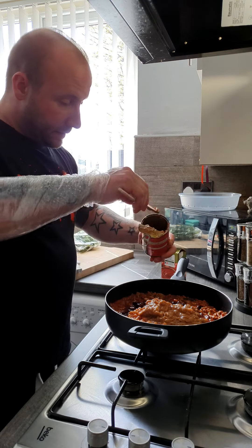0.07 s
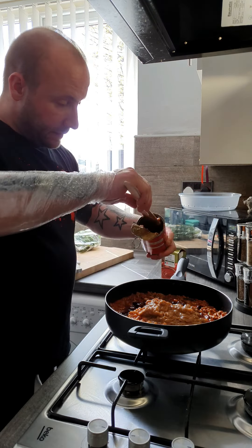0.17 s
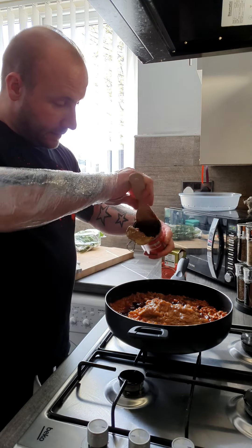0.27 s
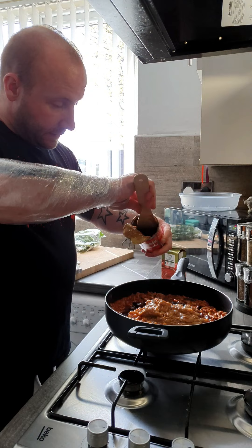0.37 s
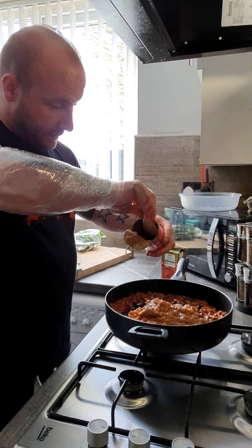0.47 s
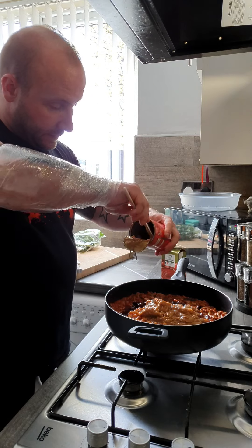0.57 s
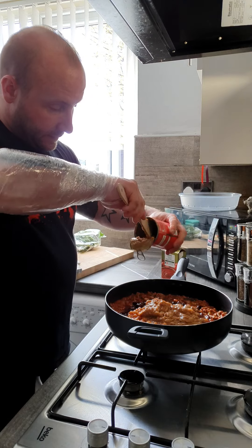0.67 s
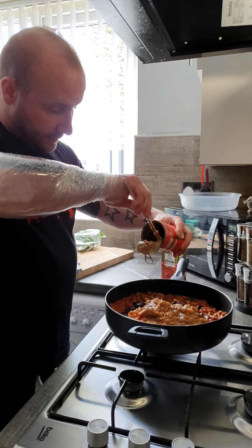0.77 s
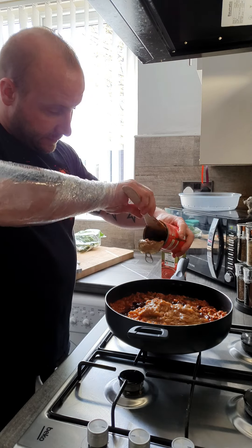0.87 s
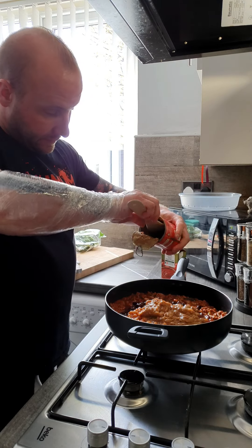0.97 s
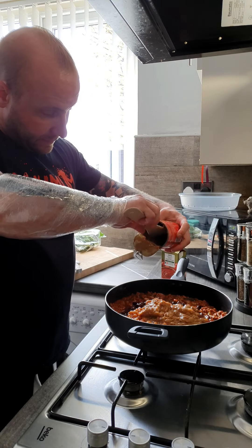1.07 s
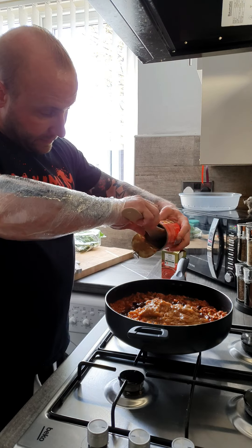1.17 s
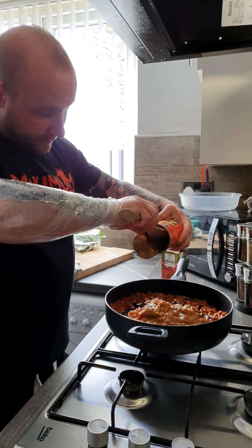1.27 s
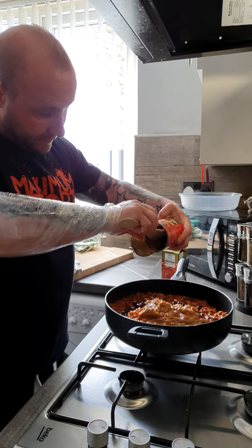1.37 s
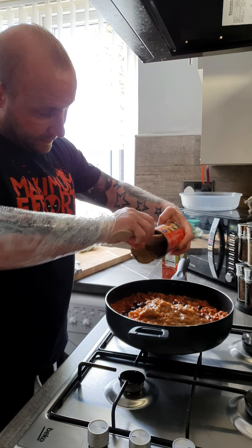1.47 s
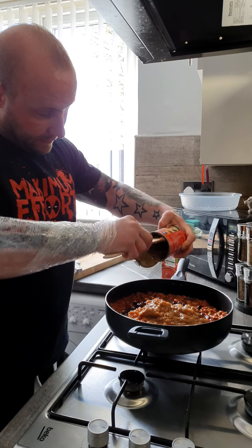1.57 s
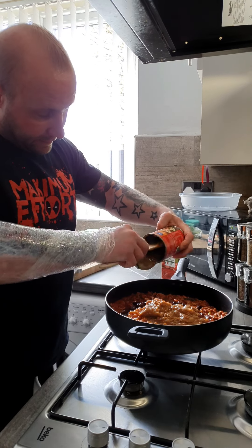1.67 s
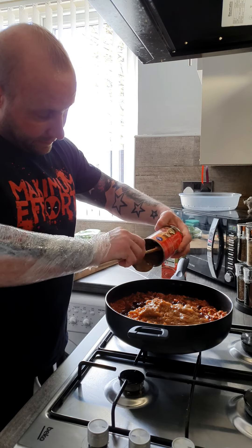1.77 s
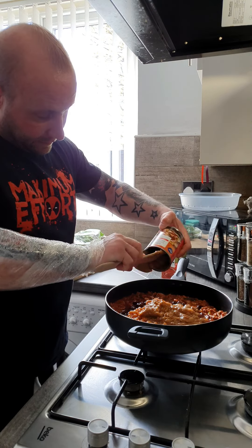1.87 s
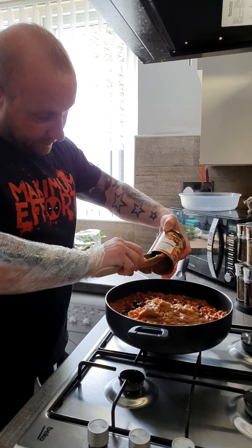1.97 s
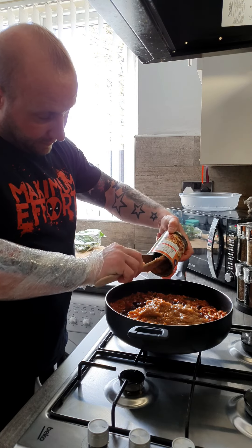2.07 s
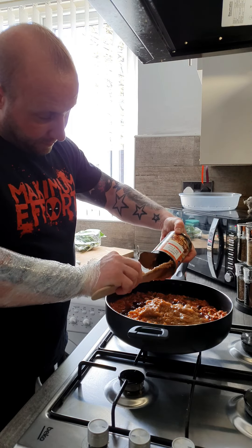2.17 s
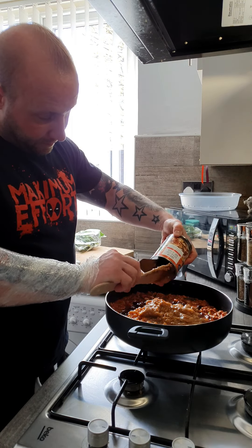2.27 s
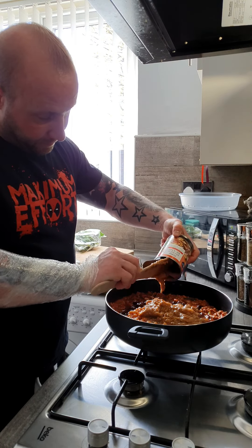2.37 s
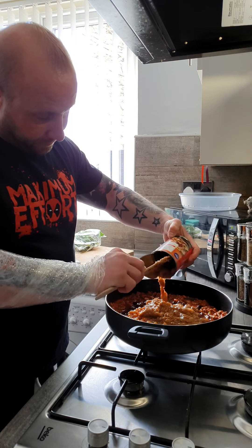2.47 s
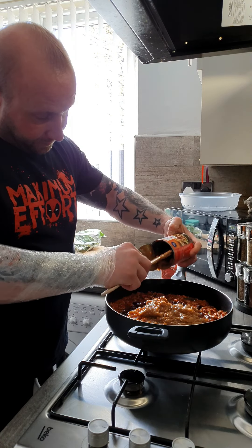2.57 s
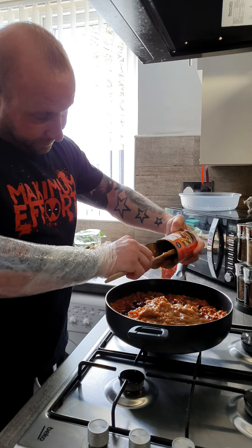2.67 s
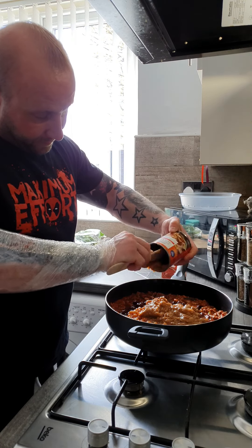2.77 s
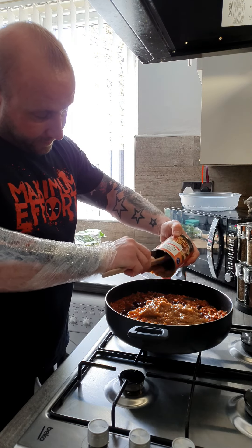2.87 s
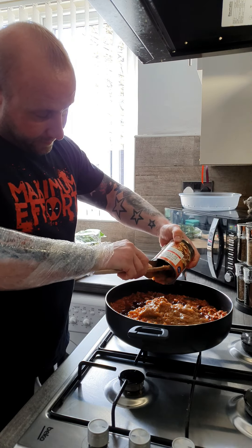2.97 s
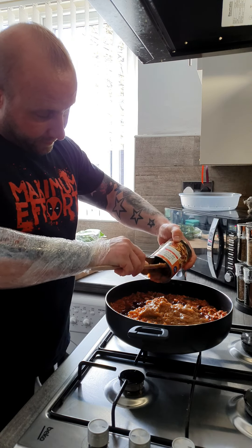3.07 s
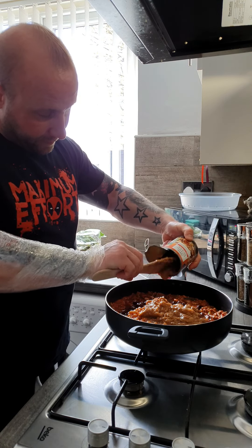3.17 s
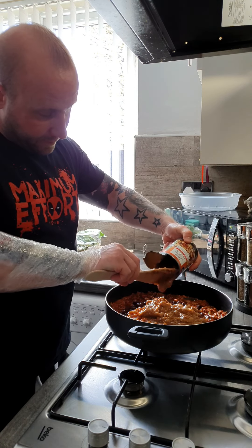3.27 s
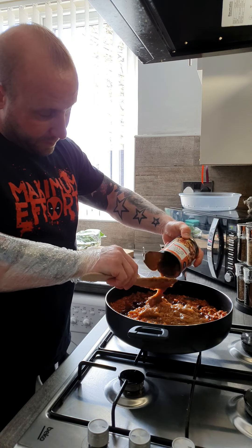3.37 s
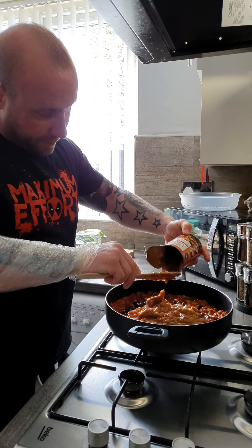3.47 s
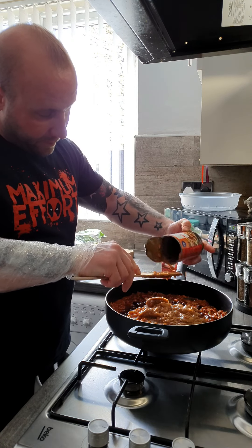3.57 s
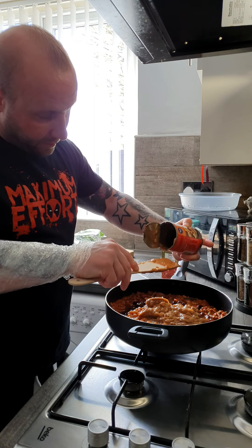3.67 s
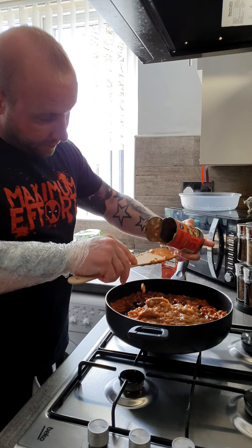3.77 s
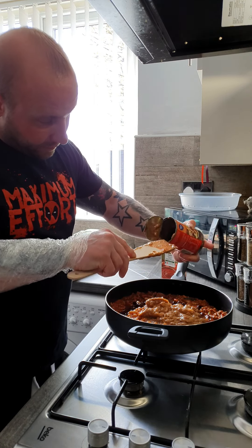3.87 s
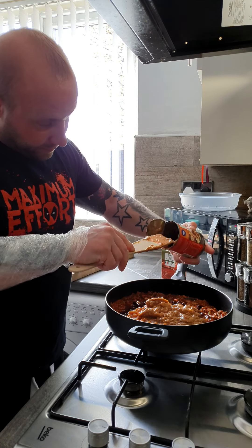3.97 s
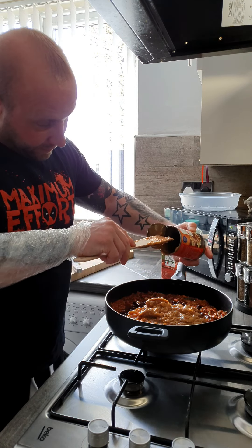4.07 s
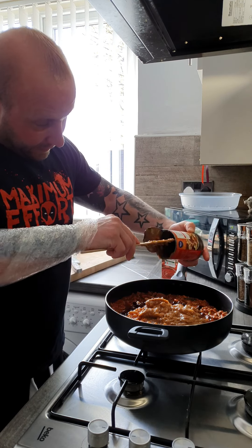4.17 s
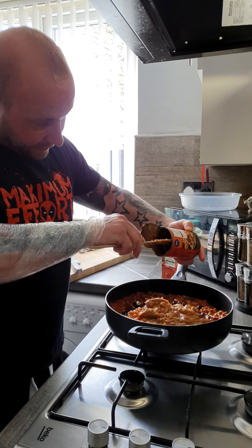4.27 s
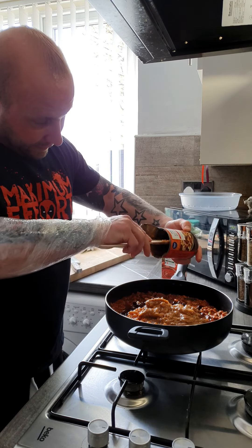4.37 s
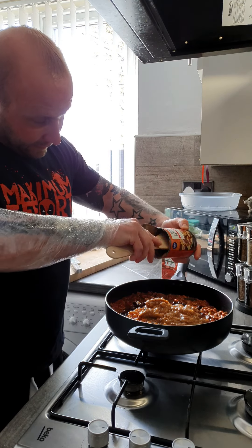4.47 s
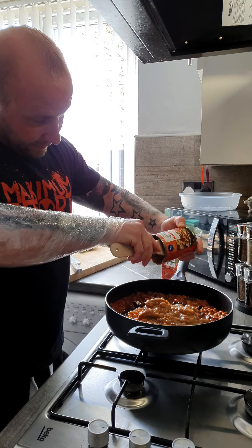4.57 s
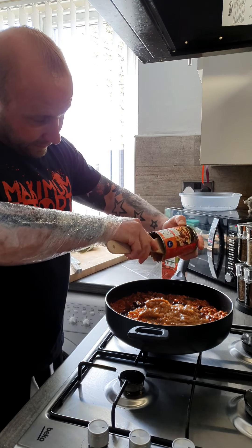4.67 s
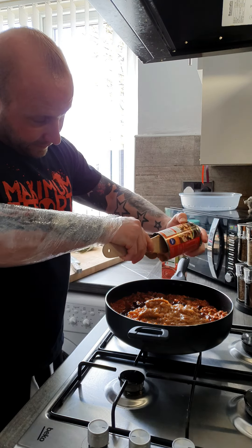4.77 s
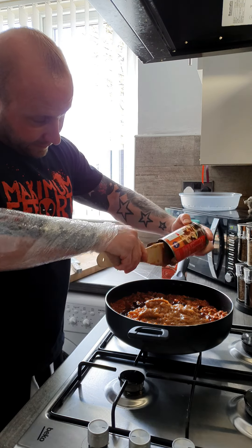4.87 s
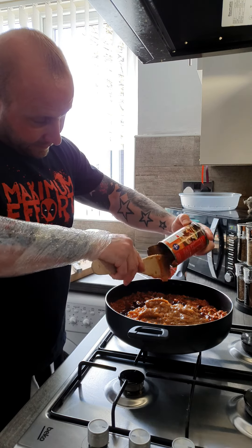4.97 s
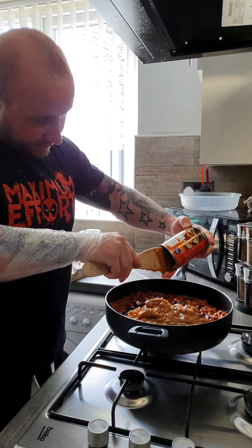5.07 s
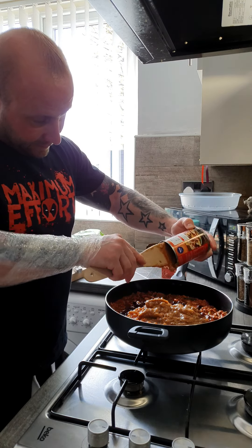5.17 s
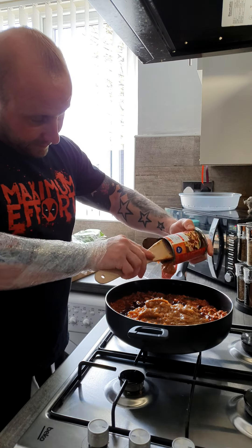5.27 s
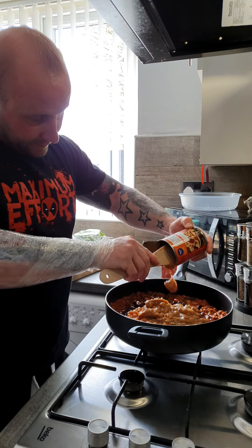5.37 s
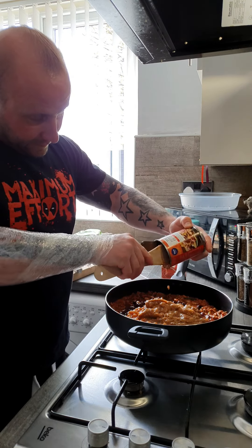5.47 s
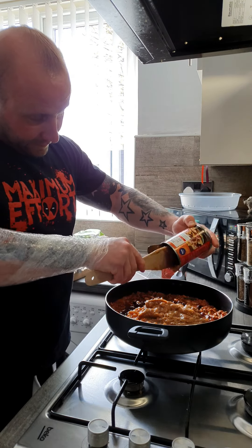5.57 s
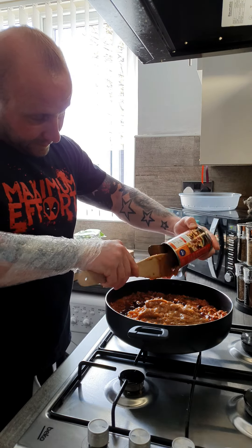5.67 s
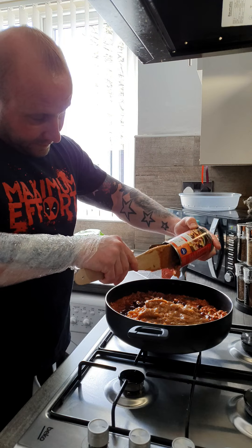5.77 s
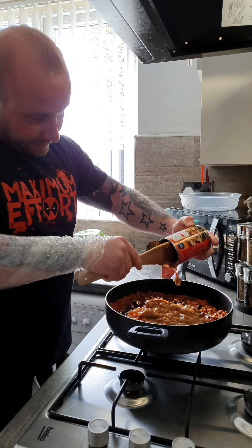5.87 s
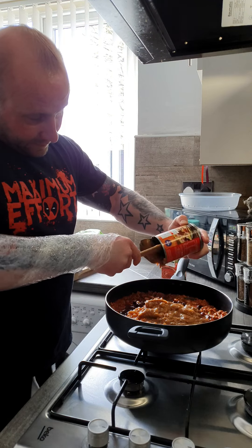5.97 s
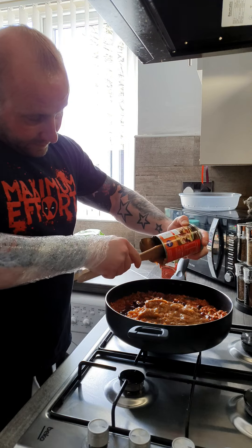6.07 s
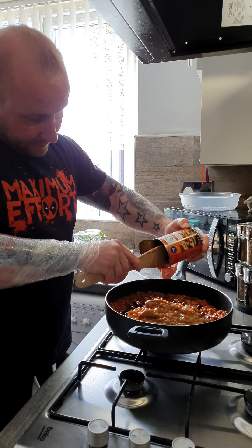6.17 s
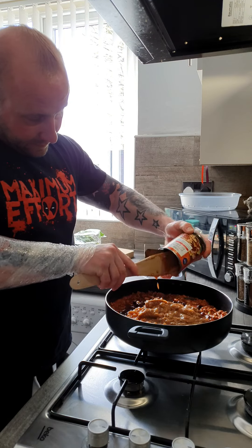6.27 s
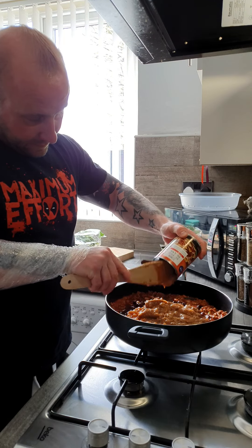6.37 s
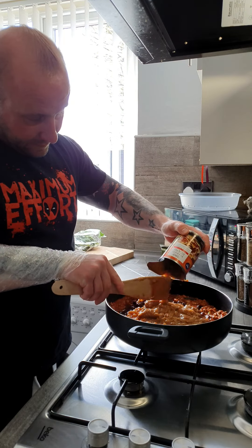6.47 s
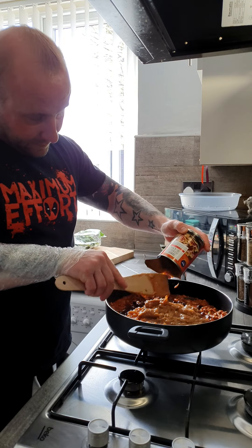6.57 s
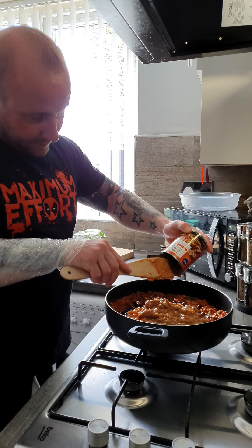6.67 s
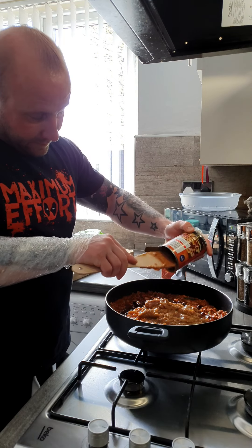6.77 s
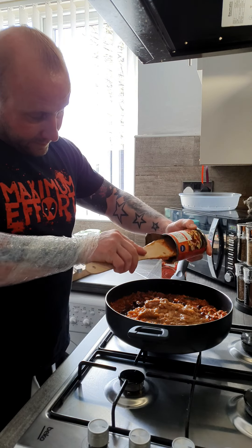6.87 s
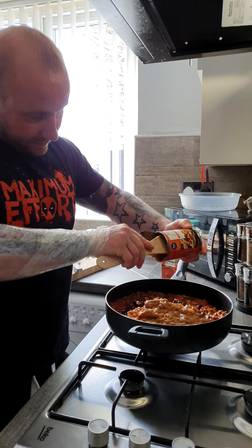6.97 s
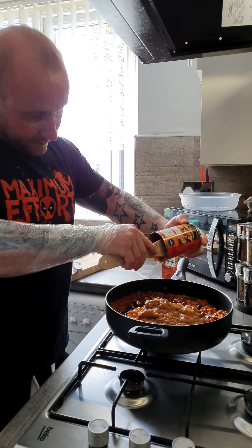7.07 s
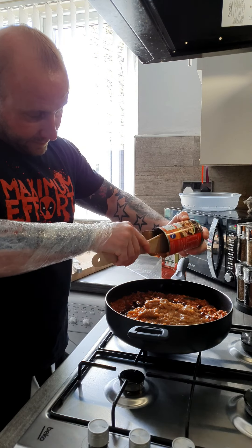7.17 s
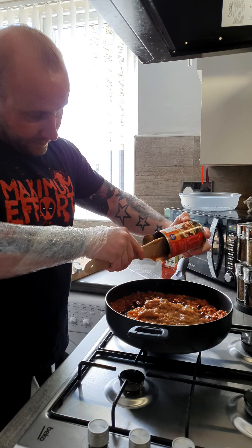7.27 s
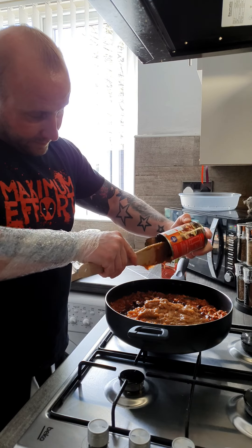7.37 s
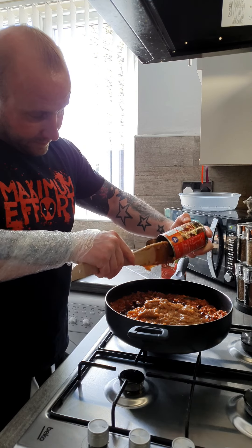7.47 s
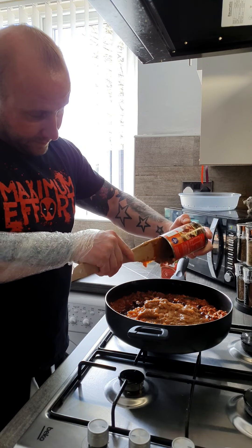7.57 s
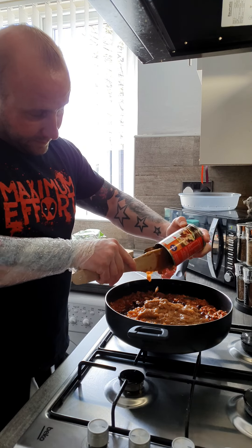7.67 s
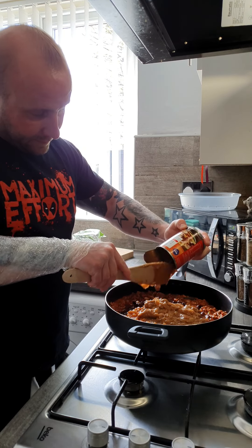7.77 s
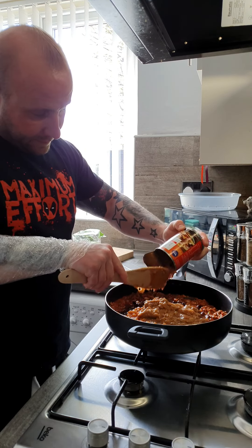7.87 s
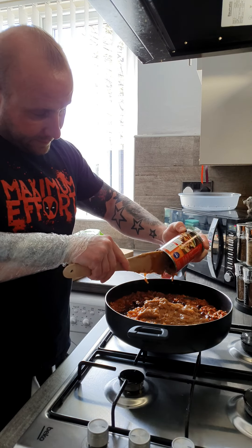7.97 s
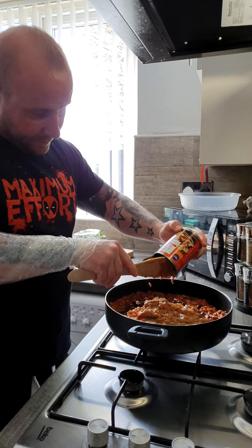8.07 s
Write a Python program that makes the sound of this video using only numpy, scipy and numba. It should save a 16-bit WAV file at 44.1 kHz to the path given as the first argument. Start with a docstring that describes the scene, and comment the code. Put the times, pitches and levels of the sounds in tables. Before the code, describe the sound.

In a quiet small kitchen, a wooden spoon rubs and clacks around the inside of a food tin nearby. Dry scrapes and a slight wet smear mix with clusters of hollow knocks, a light metallic ring and short squeaks. The work stops for a moment about halfway, then resumes with harder knocks and further strokes. A few soft, low thumps come from hands and dropping sauce, over a very faint rumble and thin whine.

```python
"""Scraping sauce from a tin

A wooden spoon scrapes thick sauce out of a food tin held over a pan, in a small hard-walled kitchen.
Rubbing, knocks, squeaks and stick-slip judders shake the thin steel wall and sound the hollow of the
tin, whose note moves as the spoon covers the mouth. Hands and falling sauce thump softly over a faint
rumble and whine."""
import sys
import numpy as np
from scipy import signal
from scipy.fft import rfft, irfft
from scipy.io import wavfile
from scipy.ndimage import uniform_filter1d
from numba import njit

SR = 44100
rng = np.random.default_rng(int(sys.argv[2]) if len(sys.argv) > 2 else 0)


def inscribe(sig):
    """Save sig as 16-bit PCM at rate SR to the path in sys.argv[1].

    A 1-D sig is mono; a 2-D sig holds one channel per row.
    Samples are clipped to [-1, 1] before scaling.
    """
    pcm = np.round(np.clip(np.atleast_2d(sig).T, -1, 1) * 32767)
    wavfile.write(sys.argv[1], SR, pcm.astype(np.int16))


N = 358076

# Levels in the tables are relative: each layer gets its own trim in the mix.
# Spoon strokes. Each row: start, build-up and length in seconds, then the levels of dry rubbing,
# wet hiss and hollow note in dB.
SPOON_STROKES = [(0.235, .05, .1, -46.5, -54, -45.5), (0.35, 0.1, .11, -43, -47, -52),
                 (0.805, 0.036, 0.08, -44, -51, -46.5), (0.886, 0.045, 0.076, -43.5, -45.5, -51),
                 (0.99, 0.019, 0.13, -55.5, -56, -62), (1.156, 0.088, 0.12, -46.5, -56.5, -51),
                 (1.362, 0.035, 0.042, -44.5, -52.5, -45), (1.455, 0.068, 0.15, -57, -54, -51),
                 (1.651, .01, 0.031, -65, -55, -69), (1.741, 0.013, 0.049, -62, -73, -57),
                 (1.815, .05, .135, -54, -62, -47), (1.965, .01, 0.06, -60.5, -62, -60),
                 (2.06, 0.041, 0.076, -45, -58, -36), (2.171, .01, .07, -49, -59, -45),
                 (2.355, .13, 0.19, -48, -53.5, -49), (2.668, .02, 0.25, -57.5, -69, -52.5),
                 (2.902, 0.028, 0.097, -52.5, -69.5, -34), (3.082, .055, .075, -51, -55.5, -41.5),
                 (3.165, 0.029, 0.093, -43.5, -49.5, -38.5), (4.093, .005, 0.018, -90, -66.5, -86),
                 (4.201, 0.098, 0.21, -49.5, -55.5, -49), (4.3, .05, 0.19, -47.5, -52.5, -43),
                 (4.442, 0.015, .15, -51.5, -51.5, -41.5), (4.725, 0.053, 0.15, -40, -50, -31),
                 (4.9, 0.022, 0.069, -73, -86, -45), (5.1, .005, 0.08, -60, -80, -56),
                 (5.139, 0.081, 0.15, -48, -50.5, -46), (5.342, 0.027, 0.046, -51, -53.5, -54.5),
                 (5.565, 0.047, 0.06, -49, -61.5, -40.5), (5.767, .005, 0.083, -50, -60, -45.5),
                 (5.895, .03, .095, -49.5, -51, -51), (6.039, 0.049, 0.44, -67, -66.5, -65.5),
                 (6.254, 0.016, 0.031, -48, -41.5, -38), (6.358, 0.025, 0.038, -48, -46.5, -47.5),
                 (6.746, .005, .05, -73, -86, -49), (6.796, 0.0079, 0.17, -52.5, -54.5, -45.5),
                 (6.919, 0.054, 0.13, -45, -51.5, -43), (7.16, .03, .14, -73, -74, -59),
                 (7.345, .025, .05, -54, -63, -50), (7.503, 0.0045, .17, -51, -59.5, -42.5),
                 (7.678, .03, .09, -56.5, -65, -50), (7.96, 0.0053, 0.15, -52.5, -58.5, -51.5)]
# The spoon shifting lightly in the tin. Each row: start and length in seconds.
LIGHT_CONTACTS = [(0.0, 2.25), (2.37, 0.66), (4.2, 0.81), (5.17, .45), (6.8, .3), (7.3, .48)]
# Knocks on the wall; the rows at 4.8 s and 4.85 s are swells of the hollow note within a judder, played the
# same way. Each row: start in seconds, clack level in dB, pitch of the struck spot in Hz,
SPOON_KNOCKS = [(0.7163, -33.5, 1800, -32, 608), (0.8165, -43, 1650, -38, 605),
                (0.852, -31.5, 2490, -38, 635), (0.9884, -33.5, 1070, -32.5, 708),
                (1.1378, -34, 1470, -40.5, 620), (1.1456, -35, 1450, -35, 726),
                (1.4894, -45, 1310, -39.5, 658), (1.5454, -40.5, 1710, -41.5, 675),
                (1.6174, -56, 1710, -40, 672), (1.8487, -37.5, 1700, -25, 569),
                (1.8794, -44, 1880, -30, 577), (1.9729, -51, 1350, -41.5, 555),
                (2.0717, -50, 2310, -25.5, 575), (2.1824, -34.5, 1430, -23.5, 573),
                (2.364, -49.5, 2270, -32, 596), (2.7008, -38.5, 1980, -32.5, 606),
                (2.7756, -31.5, 2150, -26.5, 646), (2.8374, -60, 2060, -31, 588),
                (2.911, -41.5, 1570, -24.5, 586), (2.9474, -36.5, 1400, -17.5, 558.4),
                (3.1392, -62, 2060, -26, 572), (3.2354, -44, 2020, -27.5, 592),
                (4.3049, -40, 1340, -44, 613), (4.3344, -40, 2090, -35, 667),
                (4.4603, -27, 1430, -21.5, 608), (4.574, -33, 1390, -18, 603),
                (4.7282, -39, 1430, -31, 595), (4.7536, -45, 1580, -25, 559), (4.8, -27, 1340, -15, 594),
                (4.8474, -31, 2250, -13.5, 606.6), (5.0983, -47.5, 2250, -40.5, 650),
                (5.2234, -45, 2330, -33, 628), (5.6007, -49, 1670, -30.5, 626),
                (5.7638, -28, 2330, -28, 606), (5.9105, -28, 2140, -32, 649),
                (5.9708, -33.5, 1205, -26.5, 612), (6.2587, -32, 2200, -29, 590),
                (6.2894, -35.5, 2700, -27.5, 633), (6.3839, -38.5, 2970, -38, 579),
                (6.7461, -65, 1263, -36, 610), (6.8074, -44, 2170, -39.5, 615),
                (6.9414, -47, 2170, -30.5, 669), (7.0214, -47, 1490, -32.5, 646),
                (7.5123, -37.5, 1300, -36.5, 548), (7.5717, -33, 2420, -34.5, 592),
                (7.6291, -30, 1225, -23.5, 620), (7.9668, -39.5, 1300, -39, 568),
                (8.0516, -39.5, 1660, -24.5, 618.5), (8.0706, -30, 1290, -35.5, 592)]
# Stick-slip bursts. Each row: start and length in seconds, first and last rate in slips per second,
# then the levels of wall, hollow note and low creak in dB.
SPOON_JUDDERS = [(0.697, 0.065, 153, 86, -52, -41.5, -49.5), (2.091, 0.063, 297, 263, -55, -24, -66),
                 (2.944, 0.041, 147, 163, -36.5, -22.5, -29.5), (4.755, 0.072, 280, 356, -39.5, -24, -39),
                 (4.821, 0.046, 345, 370, -38, -28.5, -36), (5.502, 0.12, 121, 153, -59, -37, -46),
                 (7.29, .1, 110, 125, -80, -56, -55)]
# Hoarse squeaks. Each row: start and length in seconds, first and last pitch in Hz, level in dB.
EDGE_SQUEAKS = [(0.206, 0.15, 2040, 1880, -56), (0.368, 0.048, 3130, 3130, -47.5),
                (0.399, 0.063, 3600, 3980, -51.5), (0.403, 0.11, 1620, 1450, -53.5),
                (0.485, 0.15, 1460, 1520, -61.5), (0.682, 0.1, 1680, 1890, -42.5),
                (0.901, 0.074, 1940, 1850, -41.5), (1.16, 0.17, 1480, 1450, -49.5),
                (1.217, 0.058, 2950, 3150, -48), (1.528, 0.052, 1780, 1830, -46.5),
                (2.403, 0.13, 3100, 3160, -55.5), (2.766, 0.059, 1950, 1860, -37.5),
                (2.926, 0.086, 1520, 1430, -36), (4.57, 0.13, 1450, 1520, -61),
                (4.724, 0.13, 1530, 1730, -33.5), (4.802, 0.059, 1840, 2520, -34.5),
                (5.216, 0.091, 2620, 1920, -56), (5.768, 0.065, 2380, 2180, -44),
                (6.794, 0.15, 3360, 3380, -53), (6.958, 0.067, 1870, 1690, -45.5),
                (7.327, 0.12, 1310, 1220, -57.5)]
# Hands and falling sauce. Each row: start in seconds, level in dB, pitch in Hz, ring time in seconds.
SOFT_THUMPS = [(0.85, -46, 190, .06), (0.988, -41, 200, .05), (1.40, -32, 201, 0.13),
               (1.412, -20.5, 59, 0.16), (1.87, -46, 150, .17), (2.778, -40, 170, .06),
               (3.822, -57.5, 167.5, 0.18), (4.13, -56.5, 188, 0.15), (4.455, -39, 230, .05),
               (6.959, -50, 160, 0.11), (6.994, -39.5, 80, 0.22), (7.031, -41, 201, 0.12),
               (7.452, -42.5, 200, 0.041), (7.487, -39, 100, 0.068), (7.60, -40.5, 82.4, 0.079)]
# Modes of the steel wall. Each row: pitch in Hz, bandwidth in Hz, level in dB.
STEEL_MODES = [(1356, 17, -5), (1337, 14, 0.5), (1397, 40, -5.5), (1630, 14, -9), (1680, 14, -14.5),
               (1795, 9.7, -6.5), (2096, 48, -3.5), (2270, 55, -4.5), (2440, 18, -2.5), (2980, 31, -7)]
# The hollow's note, lower the more the spoon covers the mouth: one curve in two consecutive lists.
# Each row: time in seconds, pitch in Hz.
HOLLOW_PITCH = [
    [(0.25, 645), (0.55, 693), (0.67, 584), (1.06, 666.5), (1.31, 608), (1.68, 682), (1.92, 562.4),
     (2.63, 593), (3.3, 567)],
    [(4.25, 642.5), (5.0, 583), (5.07, 630.5), (5.55, 609), (6.16, 661), (6.21, 614), (7.16, 638),
     (7.26, 592), (8.1, 625)],
]
# Tone curves of the layers. Each row: frequency in Hz, gain in dB.
ROOM_RUMBLE_EQ = [(20, -15.5), (50, 1.5), (100, -2), (300, -18), (650, -21), (1200, -27.5), (4000, -36),
                  (15000, -40)]
DRY_RUB_EQ = [(100, -21), (350, -3.5), (720, -4.5), (980, 2.5), (1150, -4.5), (1350, -0.5), (1700, -1.5),
              (2150, -1), (2700, -4), (3200, -1), (3950, -4), (4400, -11), (5600, -12), (8000, -26),
              (15000, -39.5)]
WET_HISS_EQ = [(1500, -3.5), (4000, 0), (5600, 0), (7000, -3.5), (8000, -3), (10000, 0), (12000, -3),
               (15500, -9.5)]
WOOD_CLACK_EQ = [(150, -23), (500, -7.5), (780, 7.5), (980, 6), (1400, -1), (2200, -2.5), (2750, -4),
                 (3700, -3), (4400, -15.5), (6000, -24), (8000, -29), (15000, -41.5)]
DULL_THUD_EQ = [(40, -31), (100, -5), (200, -7), (320, 0), (420, -3.5), (600, -3), (1200, -30.5),
                (4000, -73)]
LOW_CREAK_EQ = [(100, -27), (230, -8.5), (315, -3), (400, -0.5), (520, -16), (1200, -33), (4000, -67)]
# Stereo tilt of the microphone ports. Each row: frequency in Hz, left minus right in dB.
PORT_BALANCE = [(60, -15.5), (130, 1.5), (300, -1), (600, 3), (1400, 3), (2000, 4.5), (2500, 7), (4000, 10),
                (4500, 6.5), (6500, 15), (7700, 12), (9500, 1.5), (11000, 2.5), (14000, 8.5)]


def undb(db):
    """Decibels to gain."""
    return 10 ** (np.asarray(db) / 20)


def unit(x):
    """Scale to rms 1."""
    return x / np.sqrt(np.mean(x ** 2))


def seconds(length):
    """Time axis of a short sound."""
    return np.arange(int(length * SR)) / SR


def fade(t, t60):
    """Exponential decay by 60 dB in t60 seconds."""
    return np.exp(-np.log(1000) * t / t60)


def add(track, start, sound):
    """Mix a sound into a track at a time in seconds."""
    i = int(start * SR)
    track[i:i + len(sound)] += sound[:N - i]


def colour(x, points, size=2048):
    """Minimum-phase EQ that follows (Hz, dB) points."""
    hz, db = np.transpose(points)
    grid = np.maximum(np.fft.rfftfreq(size, 1 / SR), 1)
    gain = undb(np.interp(np.log(grid), np.log(hz), db))
    cepstrum = irfft(np.log(gain))
    cepstrum[1:size // 2] *= 2
    cepstrum[size // 2 + 1:] = 0
    return signal.fftconvolve(x, irfft(np.exp(rfft(cepstrum))))[:len(x)]


def wander(rate_hz):
    """Smooth random drift with rms 1."""
    hold = int(SR / rate_hz)
    steps = np.repeat(rng.standard_normal(N // hold + 1), hold)
    return unit(uniform_filter1d(steps, hold)[:N])


@njit
def resonate(x, hz, width_hz):
    """Band-pass whose centre can move every sample."""
    out, band_state, low_state = np.empty(len(x)), 0., 0.
    for i in range(len(x)):
        g, damping = np.tan(np.pi * hz[i] / SR), width_hz / hz[i]
        band = (band_state + g * (x[i] + 1e-18 - low_state)) / (1 + g * (g + damping))
        band_state = 2 * band - band_state
        low_state += 2 * g * band
        out[i] = damping * band
    return out


def room_tone(rumble_db=-71, whine_hz=5500, whine_db=-87.5):
    """A bed of low, wavering rumble and a thin electrical whine."""
    rumble = np.array([unit(colour(rng.standard_normal(N), ROOM_RUMBLE_EQ)) for _ in range(2)])
    whine = np.sin(2 * np.pi * np.cumsum(whine_hz + 4 * wander(25)) / SR)
    return rumble * undb(rumble_db + 2.5 * wander(6.3)) + whine * undb(whine_db)


def kitchen(x, early_db, late_db, t60, spread):
    """Direct sound, quick reflections off hob and hood, then the tiled room; spread is stereo width."""
    t = seconds(0.5)
    mid, side = rng.standard_normal((2, 2, 1, len(t)))
    early, late = mid + spread * side * np.array([[1], [-1]])
    spectrum = rfft(early * fade(t, 0.039))
    spectrum /= np.abs(spectrum) ** 0.49  # hard surfaces reflect all pitches about evenly
    early = unit(irfft(spectrum, len(t)) * fade(t, 0.2))
    late = unit(late * fade(t, t60) * np.minimum(t / 0.0079, 1))
    response = (undb(early_db) * early + undb(late_db) * late) / np.sqrt(len(t))
    return x + signal.fftconvolve(np.atleast_2d(x), response, axes=1)[:, :N]


def thumping(rise_s=0.017):
    """Hands and sauce land with a low thump and a smothered, wet splat; high thumps are mostly splat."""
    out, t = np.zeros(N), seconds(0.28)
    for start, db, hz, t60 in SOFT_THUMPS:
        splat_eq = [(hz / 3, -24), (hz, 0), (2 * hz, -3), (4.5 * hz, -18),
                    (1300, -40), (2400, -32), (5000, -55)]
        splat = unit(colour(rng.standard_normal(len(t)), splat_eq))
        body = unit(np.sin(2 * np.pi * hz * t) + undb(-6) * (hz / 70) ** 2 * splat)
        envelope = np.minimum(t / rise_s, 1) ** 2 * fade(t, t60)
        add(out, start, undb(db - 1.5) * envelope / envelope.max() * body)
    return out


def steel_wall(push, ring_db=2, patchy_db=5):
    """The wall passes each push on and rings; its modes come and go as spoon and fingers touch it."""
    ring = np.zeros(N)
    for hz, width_hz, db in STEEL_MODES:
        drive = push * undb(patchy_db * np.tanh(wander(6.8)))
        pitch = hz * (1 + 0.0027 * wander(5.9))
        ring += undb(db) * resonate(drive, pitch, float(width_hz))
    return push + undb(ring_db) * ring


def hollow(push, hz, stage_width_hz=115.0, stages=3):
    """The air in the tin rings at one broad, steep-sided note that takes a few cycles to swell."""
    for _ in range(stages):
        push = resonate(push, hz, stage_width_hz)
    return push


def grit(per_second, spread_db):
    """Tiny catches of wood on steel: random clicks of very uneven size."""
    clicks = (rng.random(N) < per_second / SR) * rng.standard_normal(N)
    return unit(clicks * undb(spread_db * rng.standard_normal(N)))


def squeaking(width_hz=150.0):
    """Catches of the dragging edge ring one narrow resonance that slides with the point of contact."""
    out, catches = np.zeros(N), grit(per_second=1400, spread_db=6.5)
    for start, length, first_hz, last_hz, db in EDGE_SQUEAKS:
        count = int(length * SR)
        glide = np.linspace(first_hz, last_hz, count)
        tone = resonate(catches[int(start * SR):][:count], glide, width_hz)
        tone = resonate(tone, glide, glide.mean() / 2)  # trims the noisy skirts
        add(out, start, unit(tone) * np.hanning(count) ** 0.65 * undb(db + 1.8))
    return out


def juddering(note_hz, jitter=0.02, scatter_db=3.5):
    """Pressed hard, the spoon sticks and slips in quick pulses that creak through wall and hollow."""
    wall, air = np.zeros(N), np.zeros(N)
    for start, length, first_rate, last_rate, wall_db, note_db, creak_db in SPOON_JUDDERS:
        count = int(length * (first_rate + last_rate) / 2)
        timing, strength = rng.standard_normal((count, 2)).T
        periods = (1 + jitter * timing) / np.linspace(first_rate, last_rate, count)
        pressure = np.hanning(count + 2)[1:-1] ** 0.19
        slips = np.zeros(int((length + 0.1) * SR))
        onsets = np.clip((np.cumsum(periods) - periods[0]) * SR, 0, len(slips) - 1).astype(int)
        slips[onsets] = pressure * undb(scatter_db * strength)
        duty = np.sqrt(length * SR / len(slips))  # sets the level by the burst, without its tail
        note = unit(hollow(slips, note_hz[int(start * SR):][:len(slips)])) * undb(note_db)
        creak = unit(colour(slips, LOW_CREAK_EQ)) * undb(creak_db)
        add(wall, start, duty * unit(colour(slips, WOOD_CLACK_EQ)) * undb(wall_db))
        add(air, start, duty * (note + creak))
    return wall, air


def knocking(spot_width_hz=130.0, swell_s=0.01):
    """Wood hits steel: a crunch of contact, a ping of the spot, a thud and a swell of the hollow note."""
    wall, ping, air = np.zeros((3, N))
    t = seconds(0.12)
    contact = fade(t, 0.021) + undb(-18.5) * fade(t, 0.046)
    age = t / swell_s
    swell = (age * np.exp((1 - age ** 2) / 2)) ** 1.95
    for start, clack_db, spot_hz, note_db, note_hz in SPOON_KNOCKS:
        crunch = colour(rng.standard_normal(len(t)) * contact, WOOD_CLACK_EQ)
        spot = resonate(crunch, np.full(len(t), spot_hz), spot_width_hz)
        thud = colour(rng.standard_normal(len(t)) * fade(t, 0.036), DULL_THUD_EQ)
        pitch = note_hz * (1 - 0.057 * fade(t, 0.03))  # bends up as the spoon rebounds from the mouth
        note = swell * np.sin(2 * np.pi * np.cumsum(pitch) / SR)
        add(wall, start, unit(crunch) * undb(clack_db - 17))
        add(ping, start, unit(spot) * undb(clack_db - 20))
        add(air, start, unit(thud) * undb((clack_db + note_db) / 2 - 22.5))
        add(air, start, note * undb(note_db + 4))
    return wall, ping, air


def shifting_contact(x, depth_db):
    """The contact patch keeps changing, so bands from 1.5 kHz up swell and sink on their own."""
    flicker = sum(resonate(x, np.full(N, hz), hz / 3) * (undb(depth_db * wander(18)) - 1)
                  for hz in np.geomspace(1500, 14000, 7))
    return unit(x + flicker)


def stroke_envelopes(entry_db=-12, ease_db=-2, release_t60=0.14, cling_db=-19.5, cling_t60=0.55):
    """Pressure builds, eases and lets go; clinging sauce drags on. Gives rub, hiss and note in dB."""
    attacks_s, light_db = (0.006, 0.022, 0.013), (-69.5, -73, -73.5)  # rub, hiss, note
    light_strokes = [(start, max(attacks_s), length, *light_db) for start, length in LIGHT_CONTACTS]
    power = np.full((3, N), 1e-14)
    for start, build, length, *levels_db in SPOON_STROKES + light_strokes:
        t = seconds(length + cling_t60)
        after = np.maximum(t - length, 0)
        press = undb(entry_db * np.maximum(1 - t / build, 0) + ease_db * np.minimum(t / length, 1))
        release = np.maximum(fade(after, release_t60), undb(cling_db) * fade(after, cling_t60))
        for track, db, attack in zip(power, levels_db, attacks_s):
            envelope = np.minimum(t / attack, 1) * press * release * undb(db)
            add(track, start, envelope ** 2)
    return 10 * np.log10(power)


def scraping(note_hz):
    """Uneven friction rubs and flexes the wall and stirs the hollow; smeared sauce hisses."""
    rub_db, hiss_db, note_db = stroke_envelopes()
    grip = undb(2 * wander(55))
    catches = unit(grit(per_second=3000, spread_db=2.5) * grip)
    wall = shifting_contact(colour(catches, DRY_RUB_EQ), depth_db=-0.5) * undb(rub_db + 1.5)
    note = unit(hollow(catches, note_hz)) * undb(note_db + 6.5)
    flexing = unit(colour(catches, DULL_THUD_EQ)) * undb((note_db + rub_db) / 2 - 7)
    smear = colour(grit(per_second=5000, spread_db=4.3) * grip, WET_HISS_EQ)
    hiss = shifting_contact(smear, depth_db=3.5) * undb(hiss_db - 0.6)
    return wall, note + flexing, hiss


def scene():
    """The hollow note and thumps sit close and centred; the wall's clatter is wide and roomy."""
    note_hz = np.interp(np.arange(N) / SR, *np.vstack(HOLLOW_PITCH).T)
    rub_wall, rub_air, hiss = scraping(note_hz)
    knock_wall, ping, knock_air = knocking()
    slip_wall, slip_air = juddering(note_hz)
    clatter = steel_wall(rub_wall + knock_wall + slip_wall) + ping + squeaking() + hiss
    wide = kitchen(clatter, early_db=7.5, late_db=3.5, t60=0.3, spread=1) * undb(-11)
    body = rub_air + knock_air + slip_air + thumping()
    close = kitchen(body, early_db=-20, late_db=-10, t60=0.32, spread=0.6)
    return wide + close + room_tone()


def record(dry):
    """Each microphone port has its own colour; the deepest bass and the top are cut off."""
    ports = [colour(channel, [(hz, side * db / 2) for hz, db in PORT_BALANCE])
             for channel, side in zip(dry, (1, -1))]
    low_cut = signal.butter(2, 32, "high", fs=SR, output="sos")
    high_cut = signal.ellip(10, 0.2, 80, 15700, fs=SR, output="sos")
    return signal.sosfilt(high_cut, signal.sosfilt(low_cut, ports))


dry = scene()
out = record(dry)
inscribe(out)
```